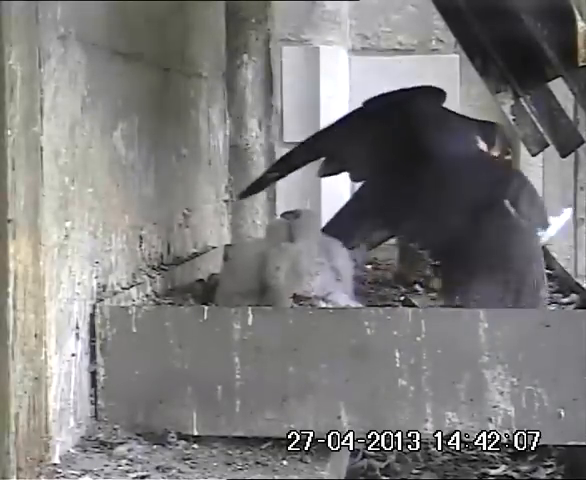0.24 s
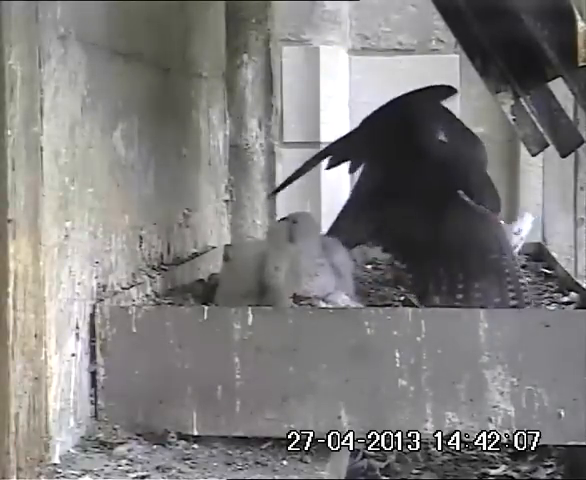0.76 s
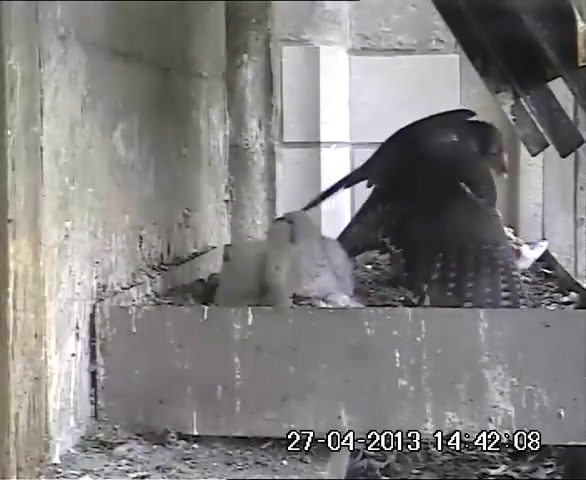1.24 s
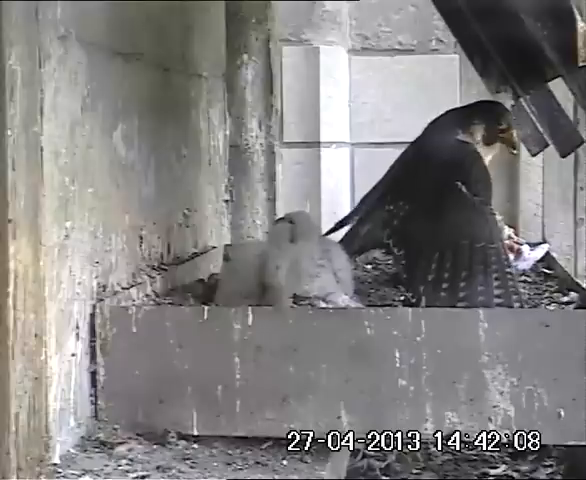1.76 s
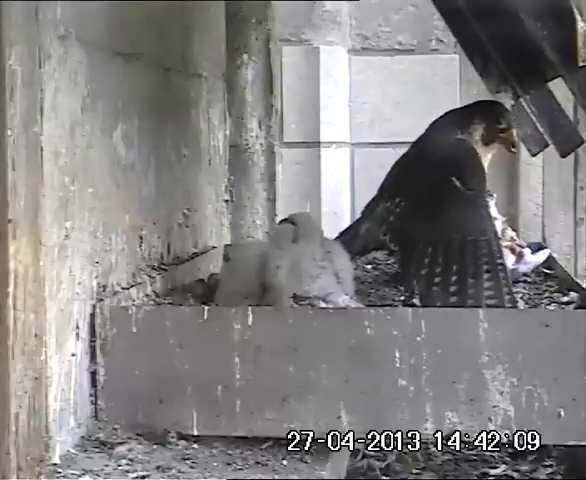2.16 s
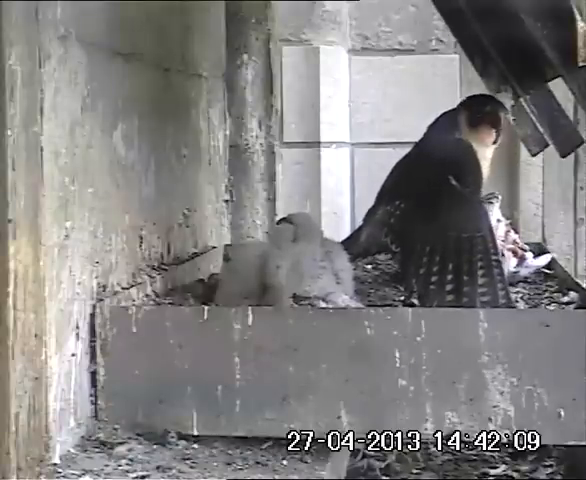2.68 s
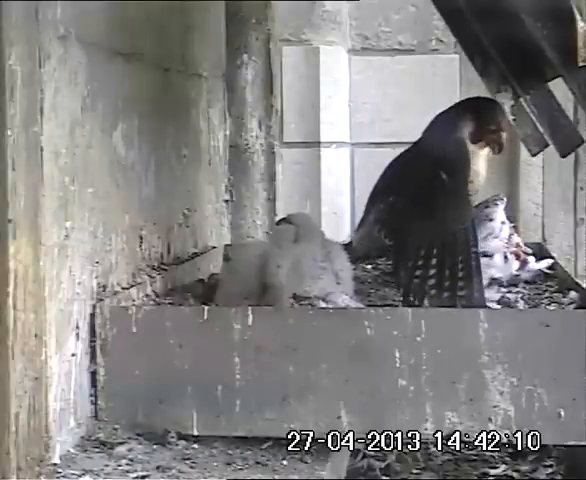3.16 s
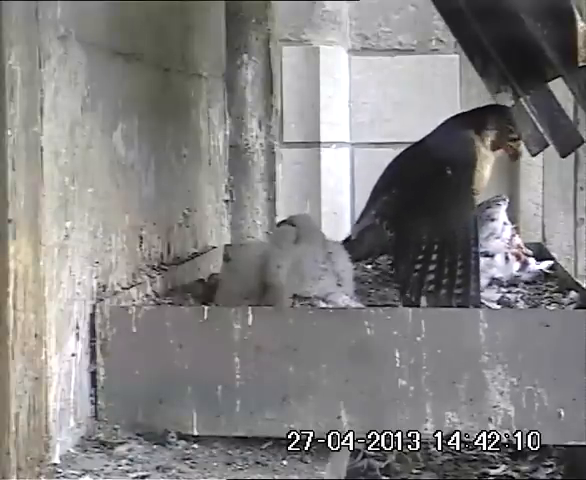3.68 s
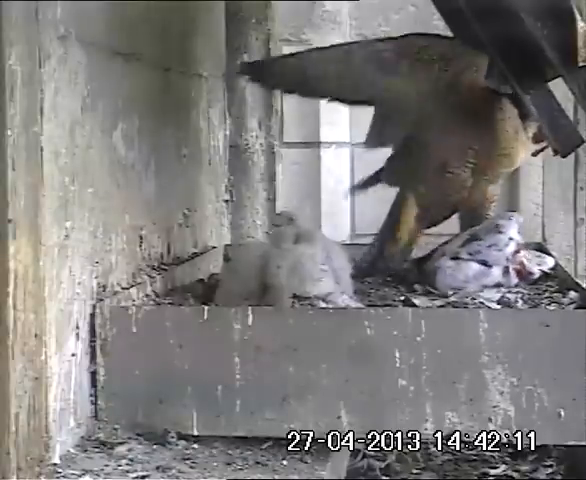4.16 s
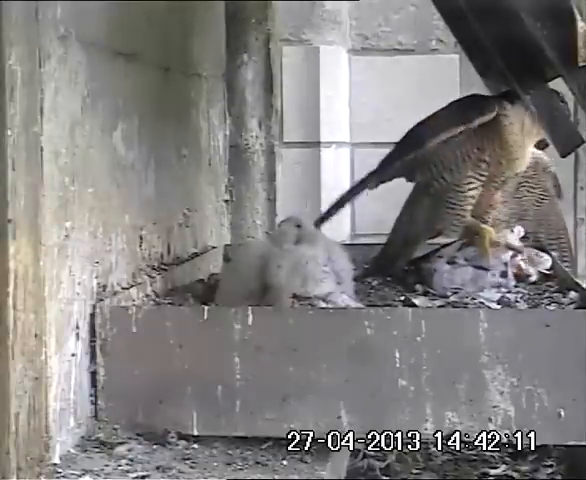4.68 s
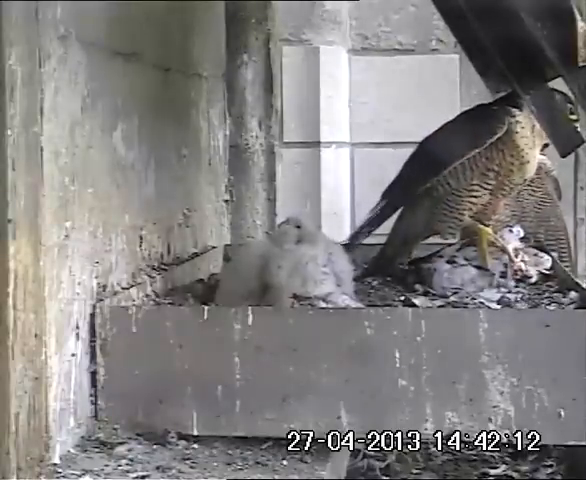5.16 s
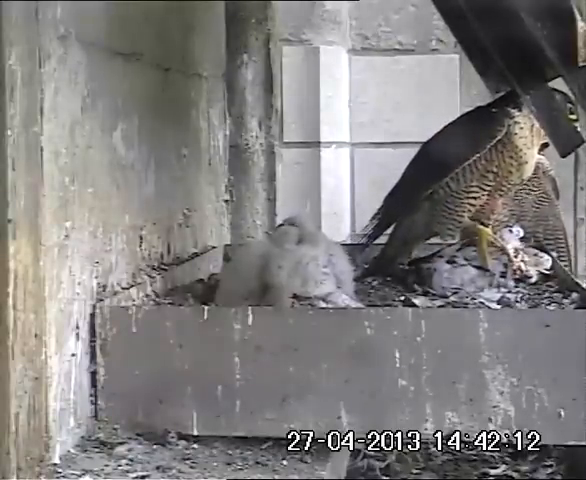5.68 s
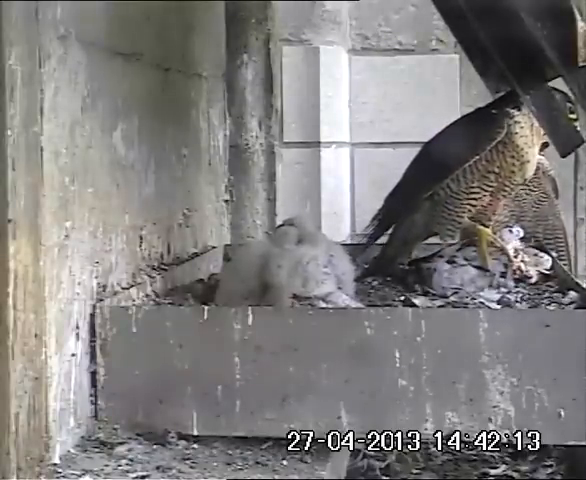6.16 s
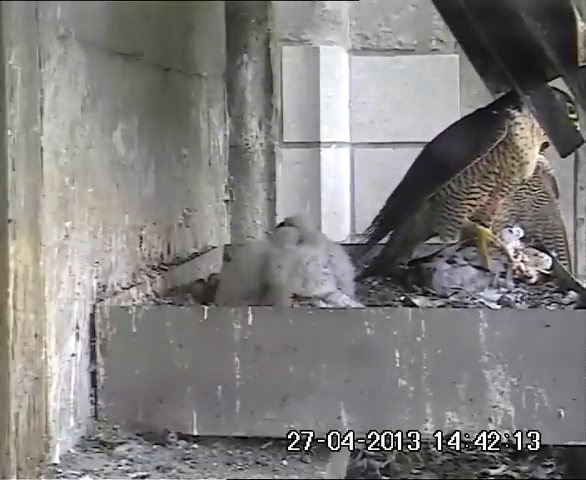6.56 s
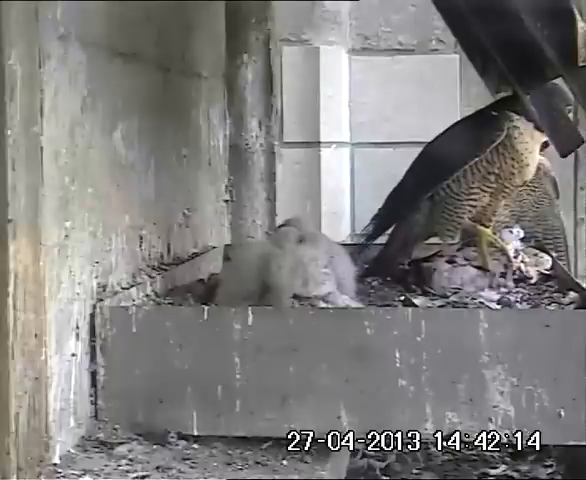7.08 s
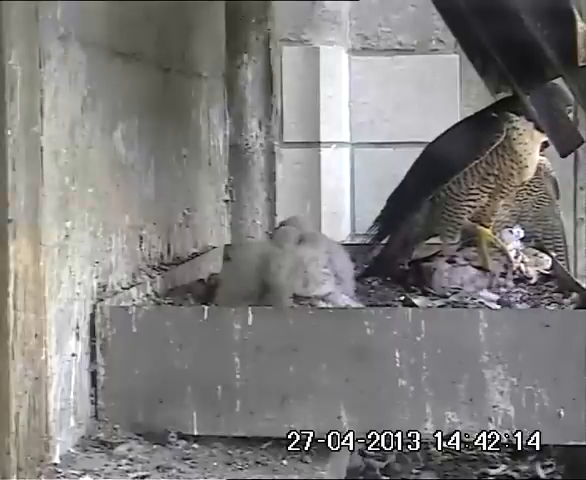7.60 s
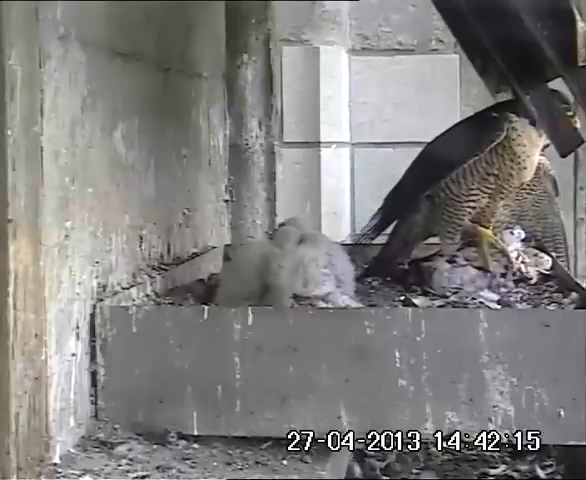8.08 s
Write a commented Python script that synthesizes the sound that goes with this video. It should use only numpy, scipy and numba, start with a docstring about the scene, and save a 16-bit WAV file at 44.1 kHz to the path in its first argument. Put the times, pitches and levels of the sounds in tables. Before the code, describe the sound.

From 0 to about 3.1 seconds, a dense falcon chatter fills a small hard-walled nest box. One bird screams in harsh quarter-second bursts, about every 0.4 seconds, each opening clear, breaking into a low uneven rasp and clearing again. Thin wavering whines ride high above until 1.7 seconds, with one quick falling squeal near 0.6. Feathers swish strongly at 0.25, 1.0 and 1.4 seconds, with a knock at the very start. Throughout, another bird gives hoarse double calls: a chip, two arched whistling notes joined by a yelp, and a short yelp to finish. After 3.1 seconds these continue alone, clearer, shorter and sharper, about every 0.4 seconds. A wing flutter near 3.9 precedes a hard knock at 4.2. Low gusty thumps bump the microphone from 7.7 to 8.3. Quiet outdoor rumble and hiss remain beneath; the narrow, limited microphone flattens loud peaks.

```python
"""First a dense chatter of falcons at feeding time in a nest box, then one bird's short double calls.
In each call the two sides of the syrinx whistle apart, break up and lock an octave apart; a second bird
screams early on in uneven pulses, with wavering whines and one falling squeal, each a single gliding voice.
Feathers rustle and feet knock as shaped noise, and close walls answer with a brief random echo.
Thumps, rumble and hiss lie beneath; a narrow-band nest camera with a limiter hears it all."""
import sys
import numpy as np
from scipy import signal
from scipy.fft import rfft, irfft
from scipy.io import wavfile
from scipy.ndimage import uniform_filter1d
from numba import njit

SR = 44100
rng = np.random.default_rng(int(sys.argv[2]) if len(sys.argv) > 2 else 0)


def to_wav(s):
    """Save 16-bit WAV."""
    ch = np.atleast_2d(s).T  # columns
    pcm = np.round(np.clip(ch, -1, 1) * 32767)  # PCM
    wavfile.write(sys.argv[1], SR, pcm.astype(np.int16))


N = 367353
T = np.arange(N) / SR

# Outdoor air around the box. Each row: frequency in Hz, relative level in dB.
AIR_SPECTRUM = [(25, -15), (50, -8.5), (80, -1.5), (130, -0.5), (280, 2), (330, -3.5), (400, 1.5),
                (520, -4), (680, 1.5), (1000, -4), (1600, -9.5), (2500, -18), (3500, -24.5), (4400, -36.5)]
AIR_DB = -30
# Hollow resonances of the box in the background. Each row: frequency in Hz, width in Hz, level in dB.
BOX_RESONANCES = [(166, 10, -49), (371.5, 22, -44.5), (903, 15, -47)]
# Low thumps. Each row: time in seconds, level in dB.
THUMPS = [(7.713, -9), (7.848, -12), (7.887, -11.5), (7.946, -8.5), (7.956, -10.5), (7.969, -11.5),
          (8.043, -8), (8.1, -17), (8.269, -10.5)]
# Rumble after a thump. Each row: frequency in Hz, relative level in dB.
RUMBLE_SPECTRUM = [(40, -23.5), (90, -4), (160, 3.5), (280, -4), (420, -15.5), (800, -45)]

# Wings and feathers brushing the box. Each row: loudest moment in seconds, half length in seconds, level in dB.
WING_STROKES = [(.25, 0.34, -20), (1.022, .2, -20), (1.42, 0.16, -22), (2.5, 0.13, -38.5),
                (3.9, 0.47, -28.5), (3.945, 0.032, -26)]
# Brushing feathers. Each row: frequency in Hz, relative level in dB.
FEATHER_SPECTRUM = [(200, -12), (700, -6), (1600, 1), (2600, -1.5), (3700, -1.5), (4400, -7)]
# Talons and wing tips knocking on gravel and walls. Each row: time in seconds, level in dB.
KNOCKS = [(.028, -4), (0.043, -28), (1.334, -18), (1.984, -24), (3.931, -15), (4.177, -2), (7.229, -29.5),
          (8.037, -33)]
# Dry knocks. Each row: frequency in Hz, relative level in dB.
KNOCK_SPECTRUM = [(200, -16.5), (450, -10), (750, 0.5), (1200, -2.5), (2600, -1.5), (3700, -2),
                  (4400, -4.5)]

# One falling squeal: its pitch sinks from the first value towards the second.
SQUEAL_START_S, SQUEAL_LENGTH_S, SQUEAL_SINK_S = .597, .083, .039
SQUEAL_FIRST_HZ, SQUEAL_END_HZ, SQUEAL_DB = 4070, 1240, -17
# Wavering whines. Each row: start in seconds, length in seconds, swings per second, trough in Hz,
# first crest in Hz, last crest in Hz, relative level in dB.
WHINES = [ (0.015, .305, 14.8, 2620, 3570, 2850, -16.5), (.762, .355, 13.8, 2820, 3750, 3080, -16),
          (1.354, .25, 12.5, 2880, 3692, 3236, -18.5), (1.675, .06, 7.7, 2840, 3355, 3340, -20)]

# Harsh screams of the second bird. Each row: start in seconds, length in seconds, relative level in dB,
# extra roughness of the opening note (ratio).
SCREAMS = [(-.08, .255, -3, 0), (0.328, 0.26, -2.5, 0), (0.763, 0.24, -0.5, 0), (1.121, 0.23, 1, .1),
           (1.513, .26, 0.5, .1), (2.008, .228, -.5, 0.08), (2.385, 0.21, 1, .2), (2.873, 0.25, 0.5, .8)]
# Course of a scream. Each row: share of the scream (0-1), mean pulse rate in Hz, relative level in dB,
# roughness (ratio).
SCREAM_COURSE = [(0, 1337, -8.5, .2), (.09, 1467, -9, 0.3), (.14, 1443, -14.5, 0.6),
                 (.17, 850.7, -14.5, 1.), (0.551, 773.4, -16, 1.), (0.849, 807.4, -17, 1.1),
                 (0.881, 1513, -11.5, .6), (.94, 1407, -7.5, 0.4), (1, 1278, -14.5, 0.4)]
# Throat and beak of the screaming bird. Each row: frequency in Hz, gain in dB.
SCREAM_THROAT = [(700, -31), (1100, -16.5), (1380, -2), (1700, -1.5), (2050, 2.5), (2400, 3.5),
                 (2800, -3.5), (3300, 2), (3650, -9.5), (4300, -17.5)]

# Double calls of the main bird. Each row: start in seconds, first arch, middle yelp and second arch
# lengths in seconds, pitch shift of the first arch in Hz, relative levels of chip, arches and middle yelp in dB.
DOUBLE_CALLS = [ (-.12, 0.067, 0.027, 0.12, -3.5, 0.5, -5, -12),
                (.322, .071, .036, 0.12, -70, -1, -0.5, -4), (.733, 0.13, .027, 0.098, 0.5, -6, -4.5, -7),
                (1.256, 0.076, .027, 0.11, -90.5, -9.5, -0.5, -3.5),
                (1.712, 0.06, .039, .110, -100, -10, -0.5, 0),
                (2.171, .068, .051, 0.098, -120, -2.5, -1.5, -2.5),
                (2.692, 0.086, .038, 0.1, 48, 1, -0.5, 1.5), (3.143, .072, .026, 0.097, 17.5, 1, -1, 0),
                (3.603, 0.068, .048, 0.091, 69.5, -1, 0.5, -1.5),
                (4.159, 0.09, .046, 0.099, 0.5, 2.5, -3.5, -2),
                (4.644, 0.056, .026, 0.08, -49.5, -1, .5, 2), (5.0, 0.054, .028, 0.067, -82, 0, -0.5, 5.5),
                (5.377, .051, .031, 0.067, -64.5, 0.5, 0, 9.5), (5.765, .055, .025, .071, -50, 1.5, 2, 3.5),
                (6.127, 0.063, .025, .067, -46, 1, 2.5, 8.5), (6.524, .062, .025, .077, 12.5, 0, 2, 9),
                (6.897, 0.073, .027, 0.076, 98.5, 1.5, -0.5, 2.5),
                (7.344, 0.068, .017, .095, 117, 1.5, 0, -2), (7.729, 0.066, .026, 0.089, 19.5, 1.5, 2, 7.5),
                (8.117, 0.06, .033, .082, 30, 2, 0.5, 8)]
# The five parts of a double call, in order. Each row: share of the part (0-1), low and high voice in Hz
# before each call's own shifts, their relative levels in dB, basic roughness (ratio).
CHIP = [(0, 1094, 2189, -17.5, -9, .15), (.75, 1292, 2558, -18, -8, .12)]
FIRST_ARCH = [(0, 2110, 2525, -25, -17.5, 0.32), (0.097, 2208, 2688, -11.5, -26, 0.18),
              (.3, 2344, 3170, -14.5, -20, 0.079), (0.579, 2545, 3380, -13.5, -20.5, 0.033),
              (0.738, 2463, 3247, -10, -19.5, 0.21), (.88, 2106, 2631, -8, -15, 0.884)]
MIDDLE_YELP = [(0, 1304, 2571, -12, -7, .35), (.2, 1298, 2576, -13, -1.5, 0.035),
               (.7, 1231, 2448, -19, -4.5, 0.072)]
SECOND_ARCH = [(0, 1273, 2566, -13.5, -8, 0.33), (.12, 1994, 2598, -14.5, -19.5, .35),
               (0.301, 2170, 2950, -12, -23, 0.14), (.6, 2350, 3150, -16, -19, 0.035),
               (0.783, 2274, 3042, -9.5, -16, .22), (0.922, 1859, 2489, -8, -20.5, .9)]
LAST_YELP = [(0, 1315, 2494, -14, -3.5, .35), (0.501, 1233, 2523, -17.5, -3, 0.089),
             (.99, 1167, 2238, -16, -9.5, 0.28)]
# Throat and beak of the calling bird. Each row: frequency in Hz, gain in dB.
CALL_THROAT = [(800, -18), (1280, 0.5), (1700, -1), (2250, 1), (2550, -1), (2800, -4), (3250, 4.5),
               (3800, -5), (4300, -6)]
CHIP_S, LAST_YELP_S, ATTACK_S, RELEASE_S = .015, .016, .003, .005
# A yelp longer than usual sags in pitch: usual length, sag of the high voice per second of extra length.
YELP_S, YELP_SAG_HZ_PER_S = 0.0279, 5500
# A yelp shorter than this never locks and stays a rasp; the second value is its added roughness.
LOCK_S, UNLOCKED_ROUGH = .02, 0.51
# The longer the second arch, the higher it swings: usual length, lift per doubling of length.
ARCH_S, LOW_LIFT_HZ, HIGH_LIFT_HZ = .085, 222.1, 319.9
# The arches start out hoarse and clear as the bird calms: extra roughness, calm roughness, calming time.
HOARSE_EXCITED, HOARSE_CALM, CALMING_S = .33, .06, 1.5
# After a long yelp the second arch starts flat and its high voice is weak: per second of extra yelp.
SPENT_HZ_PER_S, SPENT_DB_PER_S = 11000, 420


def undb(db):
    """Decibels to gain."""
    return 10 ** (np.asarray(db) / 20)


def unit(x):
    """Scale to rms 1."""
    return x / np.sqrt(np.mean(x ** 2))


def add(out, x, start):
    """Mix x in from a start time, dropping what falls outside."""
    i = int(start * SR)
    a, b = max(i, 0), min(i + len(x), N)
    out[a:b] += x[a - i:b - i]


def colour(x, points):
    """Filter with a spectrum of (Hz, dB) points, joined along log frequency."""
    hz, db = np.transpose(points)
    f = np.maximum(np.arange(N // 2 + 1) * SR / N, 1)
    return irfft(rfft(x) * undb(np.interp(np.log(f), np.log(hz), db)), N)


def noise(points):
    """Noise of rms 1 with a spectrum of (Hz, dB) points."""
    return unit(colour(rng.standard_normal(N), points))


def flutter(count, hz):
    """Random motion of rms 1, low-passed at hz."""
    lead = 4096  # samples for the filter to settle
    low_pass = signal.butter(2, hz, fs=SR, output="sos")
    return unit(signal.sosfilt(low_pass, rng.standard_normal(count + lead))[lead:])


def background():
    """Steady outdoor rumble and hiss, with the hollow tones of the box as randomly swelling sines."""
    hollow = np.zeros(N)
    for hz, width, db in BOX_RESONANCES:
        hollow += undb(db) * np.sqrt(2) * flutter(N, width / 2) * np.sin(2 * np.pi * hz * T)
    return undb(AIR_DB) * noise(AIR_SPECTRUM) + hollow


def buffeting(push_s=0.0011, rumble_db=-15, rumble_s=0.086):
    """Low irregular thumps, like gusts on the microphone: each is one swing of pressure and a short rumble."""
    pushes, rumble = np.zeros(N), np.zeros(N)
    for s, db in THUMPS:
        age = T - s
        pushes -= undb(db) * (1 - (age / push_s) ** 2) * np.exp(-(age / push_s) ** 2 / 2)
        tail = undb(db + rumble_db) * (age >= 0) * np.exp(-np.abs(age) / rumble_s)
        rumble = np.maximum(rumble, tail)
    return pushes + rumble * noise(RUMBLE_SPECTRUM)


def nest_box(x, early_db=-15, early_t60=0.11, late_db=-21, late_t60=0.12):
    """Close walls return a dense quick echo and a fainter, slightly longer ring."""
    t = np.arange(SR // 4) / SR
    first_wall_s = 0.00202  # about 0.7 m of extra path
    echo = np.zeros(len(t))
    for db, t60 in ((early_db, early_t60), (late_db, late_t60)):
        ring = rng.standard_normal(len(t)) * (t > first_wall_s) * np.exp(-np.log(1000) * t / t60)
        echo += undb(db) * ring / np.linalg.norm(ring)
    return x + signal.fftconvolve(x, echo)[:N]


def movements(patchy_db=3.0, knock_s=0.0056, stirring_db=-59):
    """Feathers brush in uneven strokes over a faint stirring; each knock is a short dry burst."""
    strokes = undb(stirring_db) + sum(undb(db) * np.exp(-((T - s) / half) ** 2) for s, half, db in WING_STROKES)
    brush = strokes * undb(patchy_db * flutter(N, 29))
    knocks = sum(undb(db) * (T >= s) * np.exp(-np.abs(T - s) / knock_s) for s, db in KNOCKS)
    return brush * noise(FEATHER_SPECTRUM) + knocks * noise(KNOCK_SPECTRUM)


def call_time(length):
    """Time axis of one call with its attack and release."""
    return np.arange(-ATTACK_S, length + 5 * RELEASE_S, 1 / SR)


def gate(t, length):
    """Air flow starts abruptly just before 0 and dies away after length."""
    return np.clip(1 + t / ATTACK_S, 0, 1) * np.exp(-np.maximum(t - length, 0) / RELEASE_S)


def membrane(hz, db, rough, swing_hz=480, chaos_hz=520, shimmer=0.34):
    """One side of the syrinx as a rotating phasor; roughness shakes its pitch and its swing."""
    smooth_hz = uniform_filter1d(hz, size=130)  # about 3 ms
    pitch = smooth_hz + rough * swing_hz * flutter(len(hz), chaos_hz)
    shake = rough * shimmer
    swing = (1 + shake * flutter(len(hz), chaos_hz)) / np.sqrt(1 + shake ** 2)
    return undb(db) * swing * np.exp(2j * np.pi * np.cumsum(pitch) / SR)


def squeal(rough=0.34, tremor_db=4.0, edge_db=-5):
    """A thin voice slides down, fast at first, with a trembling level that arches up halfway."""
    t = call_time(SQUEAL_LENGTH_S)
    pitch = SQUEAL_END_HZ + (SQUEAL_FIRST_HZ - SQUEAL_END_HZ) * np.exp(-t / SQUEAL_SINK_S)
    arch_db = edge_db * (2 * t / SQUEAL_LENGTH_S - 1) ** 2
    level_db = SQUEAL_DB + arch_db + tremor_db * flutter(len(t), 90)
    out = np.zeros(N)
    voice = membrane(pitch, level_db, rough).imag
    add(out, voice * gate(t, SQUEAL_LENGTH_S), SQUEAL_START_S - ATTACK_S)
    return out


def whines(rough=0.25, tremor_db=2.5, trough_db=3.0, fade_db=-4):
    """A single high voice swings quickly up and down, stronger in the troughs; swings shrink and fade."""
    out = np.zeros(N)
    for start, length, rate, trough_hz, first_hz, last_hz, db in WHINES:
        t = call_time(length)
        swing = np.sin(np.pi * rate * t) ** 2
        crest_hz = np.interp(t, [0, length], [first_hz, last_hz])
        pitch = trough_hz + swing * (crest_hz - trough_hz)
        level_db = db + trough_db * (.5 - swing) + fade_db * (t / length - .5)
        level_db = level_db + tremor_db * flutter(len(t), 90)
        add(out, membrane(pitch, level_db, rough).imag * gate(t, length), start - ATTACK_S)
    return out


def screams(jitter=0.077, jitter_hz=450, wander=0.072, rasp_db=-8, throb_db=1.0,
            cracked_db=-14, swell_s=.03, count=5):
    """A second bird: a clear low note drops into slower, very uneven pulses (a rasp), then clears again."""
    shares, *course = np.transpose(SCREAM_COURSE)
    out = np.zeros(N)
    for start, length, db, cracked in SCREAMS:
        t = call_time(length)
        rate, level_db, rough = (np.interp(t / length, shares, c) for c in course)
        opening_rough = np.clip(cracked + rough[0], 0, 1) * (t < length / 2)
        rough = np.maximum(rough, opening_rough)
        # the more cracked the opening, the more the scream swells in instead of starting on a clear note
        level_db = level_db + cracked * cracked_db * np.exp(-np.abs(t) / swell_s)
        unevenness = jitter * flutter(len(t), jitter_hz) + wander * flutter(len(t), 35)
        phase = 2 * np.pi * np.cumsum(rate * (1 + rough * unevenness)) / SR
        voice = np.zeros(len(t))
        for k in range(1, count + 1):
            # turbulence shakes each harmonic separately
            turbulence = 1 + rough * undb(rasp_db) * flutter(len(t), 400)
            voice += np.sin(k * phase + rng.uniform(0, 2 * np.pi)) * turbulence
        effort_db = db + level_db + throb_db * flutter(len(t), 34)
        add(out, voice * undb(effort_db) * gate(t, length), start - ATTACK_S)
    return colour(out, SCREAM_THROAT) * undb(-1.5)


def syrinx(low_hz, high_hz, low_db, high_db, rough, sum_db, rasp_db, rasp_hz=1100):
    """Both sides share one air stream, which adds their sum tone and a skirt of turbulence."""
    low, high = membrane(low_hz, low_db, rough), membrane(high_hz, high_db, rough)
    turbulence = undb(rasp_db) * np.sqrt(rough) * flutter(len(rough), rasp_hz)
    return np.imag((low + high) * (1 + turbulence) + undb(sum_db) * low * high)


def double_calls(quaver_hz=24, tremor_db=2.0, second_arch_db=-1.5, breakup=.04):
    """A chip, a two-voiced arch that collapses into a yelp, then a second arch and a short yelp."""
    parts = (CHIP, FIRST_ARCH, MIDDLE_YELP, SECOND_ARCH, LAST_YELP)
    stages = [k + row[0] for k, part in enumerate(parts) for row in part]
    course = np.vstack(parts)[:, 1:].T
    out = np.zeros(N)
    for start, arch1_s, yelp_s, arch2_s, shift_hz, chip_db, arch_db, yelp_db in DOUBLE_CALLS:
        marks = np.cumsum([0, CHIP_S, arch1_s, yelp_s, arch2_s, LAST_YELP_S])
        t = call_time(marks[-1])
        # stage counts through the parts: 0-1 chip, 1-2 first arch, and so on
        stage = np.interp(t, marks, np.arange(len(marks)))
        low, high, low_db, high_db, rough = (np.interp(stage, stages, c) for c in course)
        # rounded weights, each rising and falling within its own part
        arch1, yelp, arch2 = (np.sqrt(np.abs(np.sin(np.pi * np.clip(stage - k, 0, 1)))) for k in (1, 2, 3))
        sag = YELP_SAG_HZ_PER_S * (yelp_s - YELP_S) * yelp ** 2
        lift = arch2 * np.log2(arch2_s / ARCH_S)
        spent = arch2 * max(yelp_s - YELP_S, 0)
        flat = SPENT_HZ_PER_S * spent * np.interp(t, marks[3:5], [1, 0])
        hoarse = HOARSE_CALM + HOARSE_EXCITED * np.exp(-(start / CALMING_S) ** 2)
        hoarse = hoarse + arch2 * breakup * rng.exponential()
        # in the arches the two sides are unlocked, and each quavers on its own
        free = arch1 + arch2
        low = low - sag / 2 - flat + arch1 * shift_hz + lift * LOW_LIFT_HZ
        low = low + free * quaver_hz * flutter(len(t), 70)
        high = high - sag + arch1 * shift_hz + lift * HIGH_LIFT_HZ
        high = high + free * quaver_hz * flutter(len(t), 70)
        high_db = high_db - SPENT_DB_PER_S * spent
        rough = np.abs(rough + free * hoarse + yelp * (yelp_s < LOCK_S) * UNLOCKED_ROUGH)
        voice = syrinx(low, high, low_db, high_db, rough, sum_db=-2.0, rasp_db=-12.5)
        effort_db = (stage < 1) * chip_db + free * arch_db + yelp * yelp_db + arch2 * second_arch_db
        effort_db = effort_db + free * tremor_db * flutter(len(t), 83)
        add(out, voice * undb(effort_db) * gate(t, marks[-1]), start - ATTACK_S)
    return colour(out, CALL_THROAT) * undb(-.5)


def scene():
    """The birds in their box, with the thumps and the background outside its echo."""
    birds = double_calls() + screams() + whines() + squeal() + movements()
    return (nest_box(birds) + buffeting() + background())[None]


@njit
def peak_hold(x, keep):
    """Follows each peak at once and lets go slowly."""
    held, e = np.empty(len(x)), 0.
    for i in range(len(x)):
        e = max(abs(x[i]), e * keep)
        held[i] = e
    return held


def record(dry, release_s=0.0077, band_hz=4104, ceiling=.72, top_hz=15800):
    """The camera passes only a narrow band; a limiter snaps at the loud peaks and spits a little treble."""
    narrow = signal.sosfilt(signal.cheby1(12, .3, band_hz, fs=SR, output="sos"), dry[0])
    held = peak_hold(narrow, np.exp(-1 / (release_s * SR)))
    limited = narrow * ceiling / np.maximum(held, ceiling)
    # the limiter's treble is cut off only at the top of the range
    return signal.sosfilt(signal.ellip(8, .2, 70, top_hz, fs=SR, output="sos"), limited)[None]


dry = scene()
out = record(dry)
to_wav(out)
```